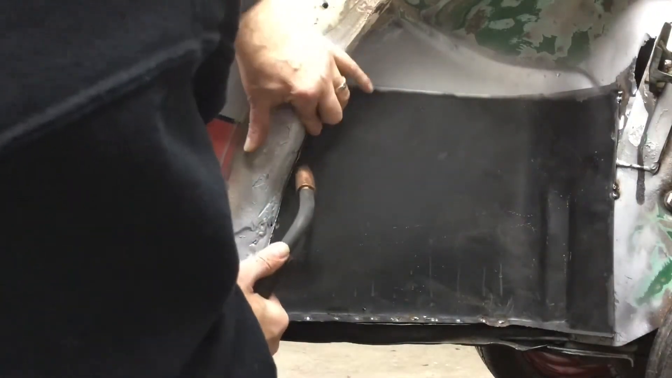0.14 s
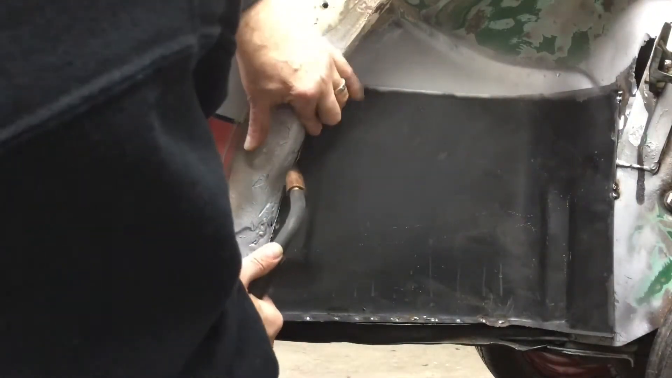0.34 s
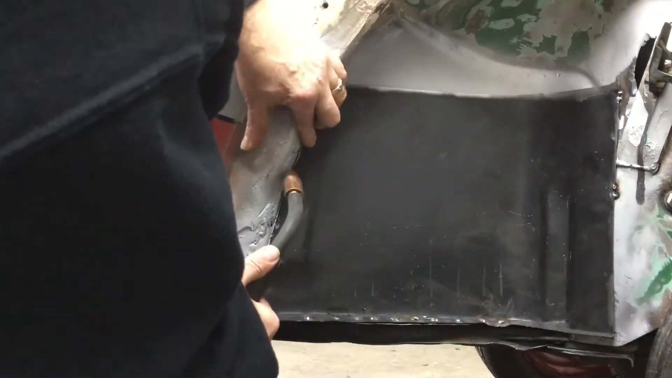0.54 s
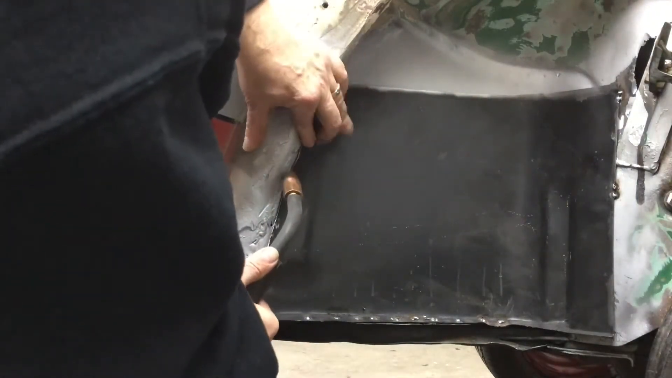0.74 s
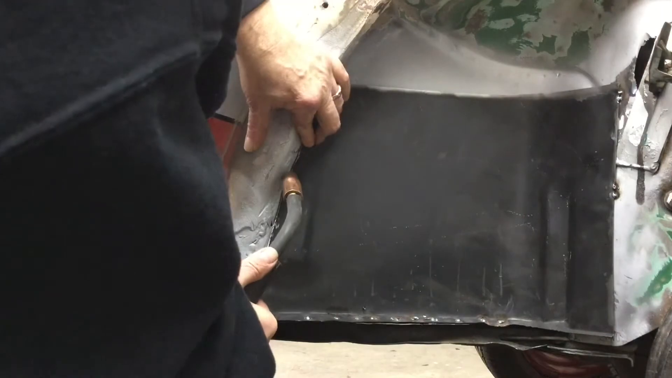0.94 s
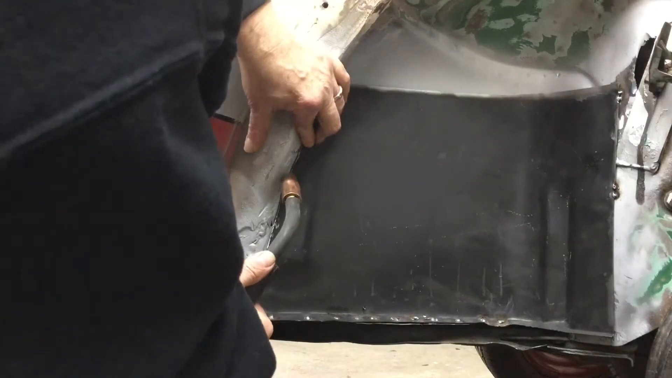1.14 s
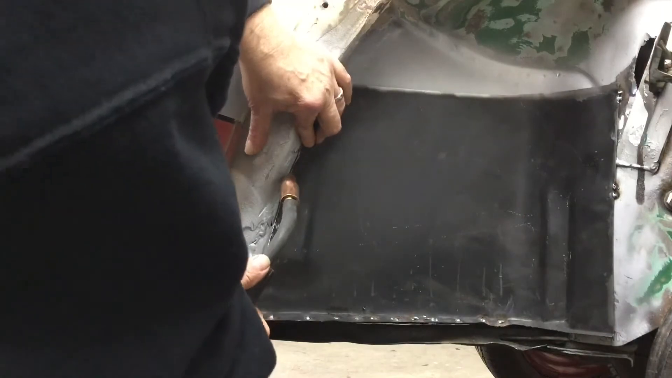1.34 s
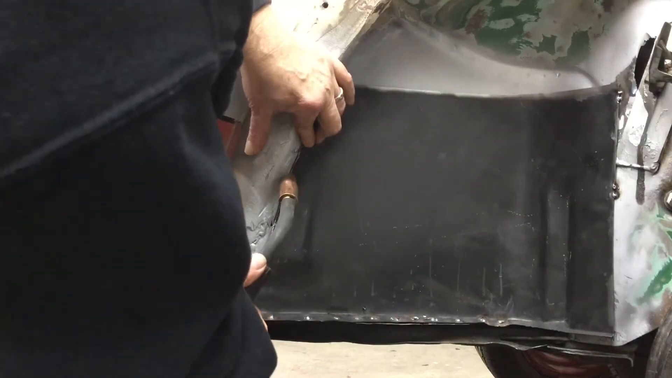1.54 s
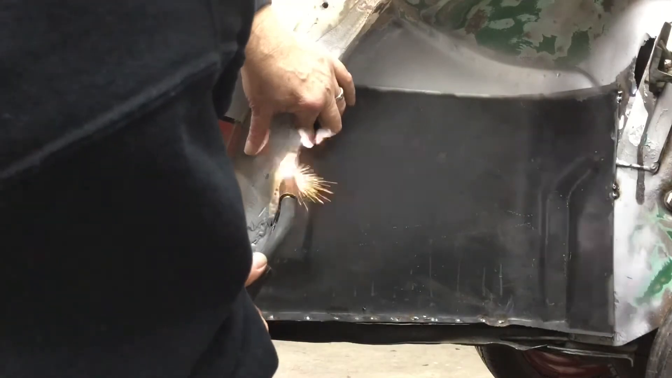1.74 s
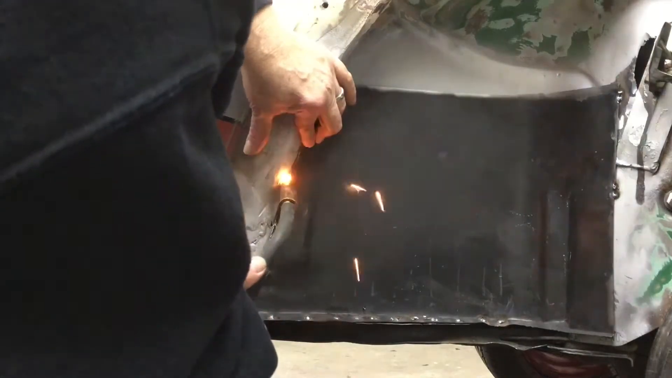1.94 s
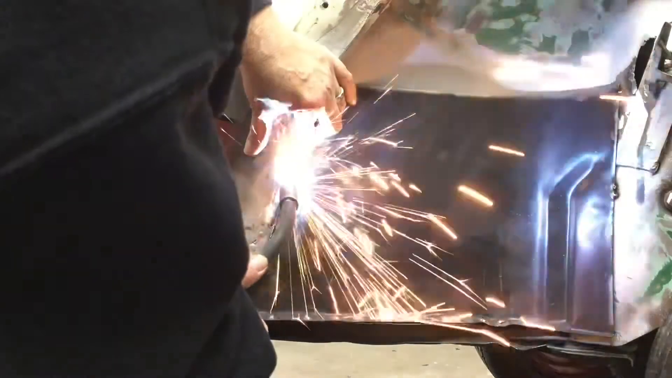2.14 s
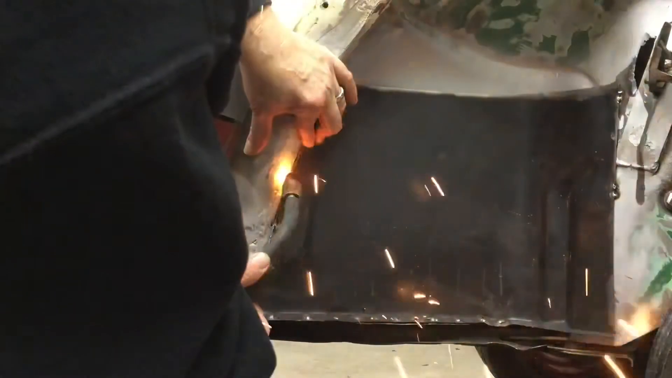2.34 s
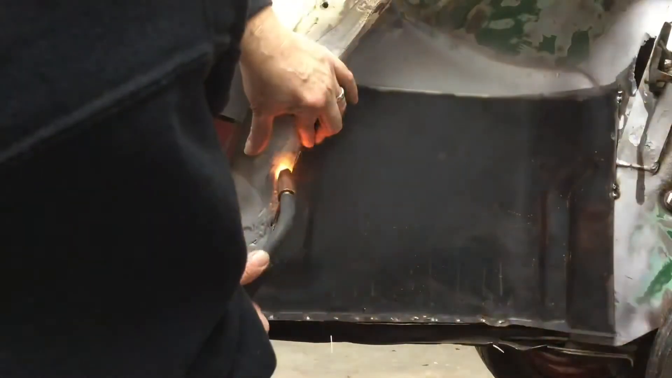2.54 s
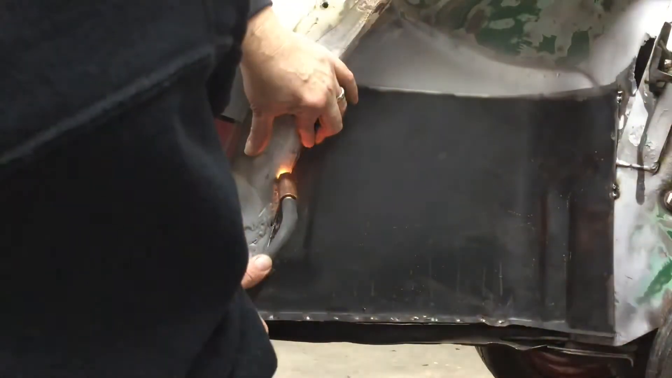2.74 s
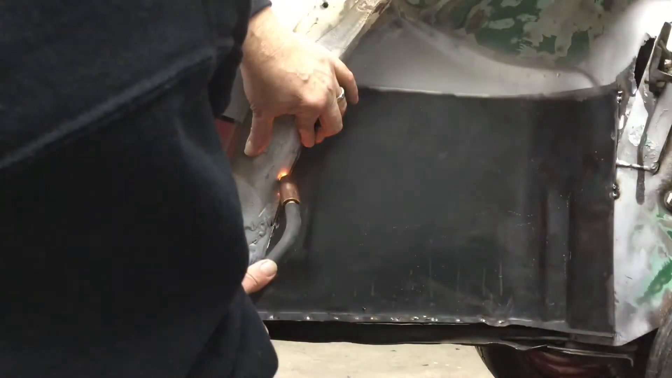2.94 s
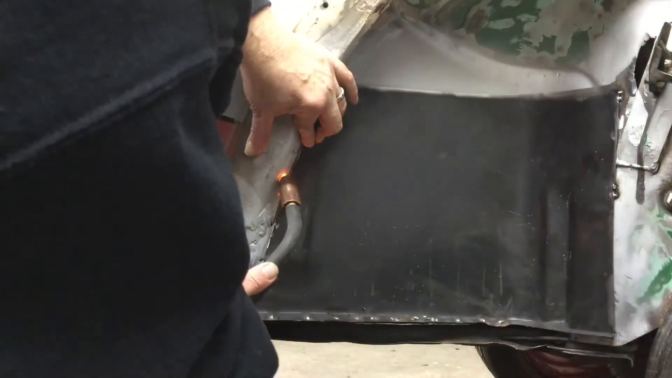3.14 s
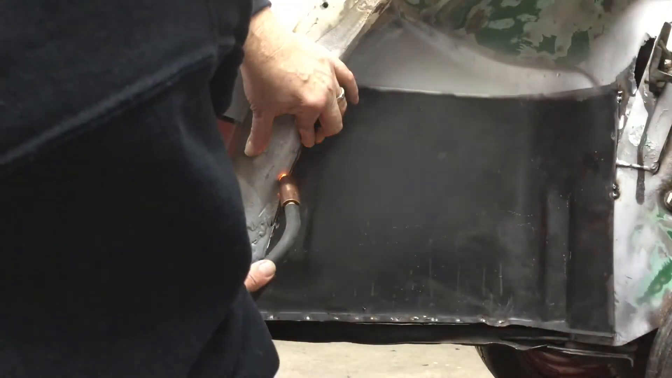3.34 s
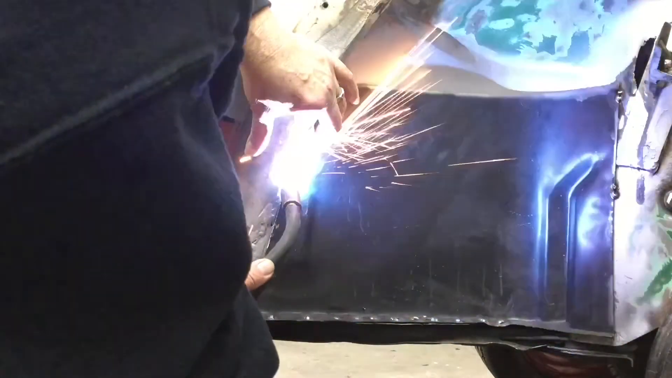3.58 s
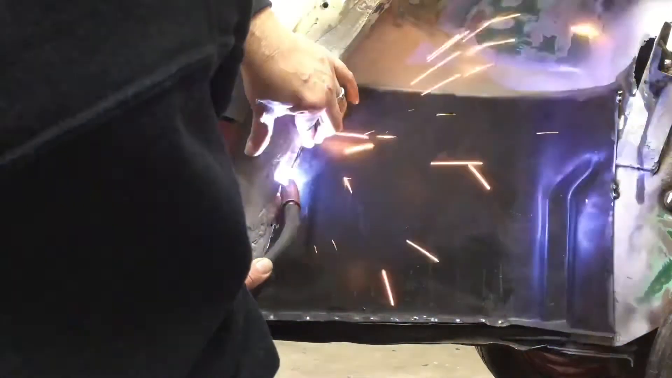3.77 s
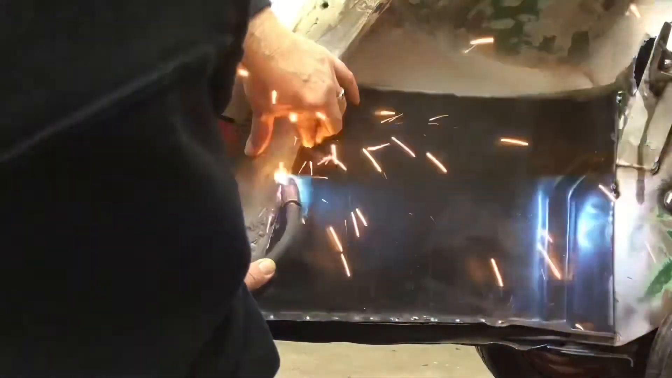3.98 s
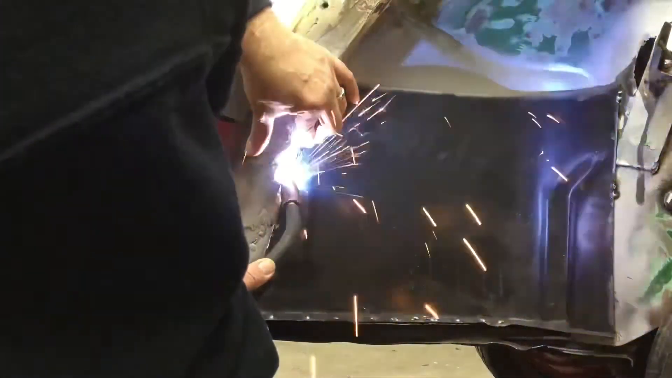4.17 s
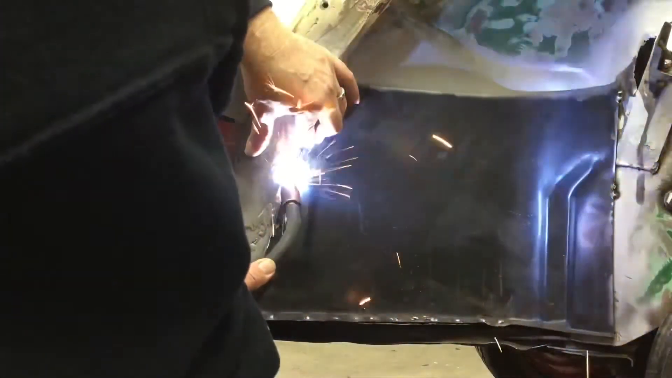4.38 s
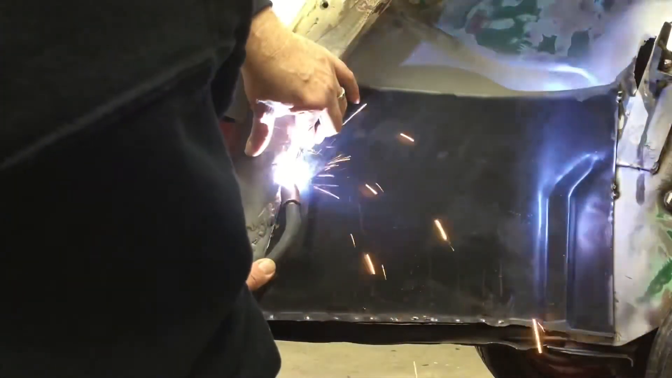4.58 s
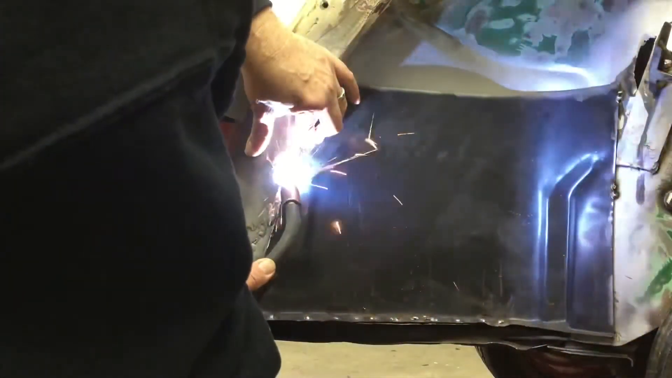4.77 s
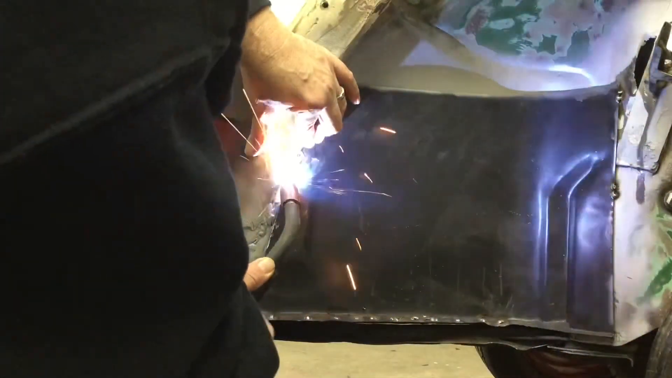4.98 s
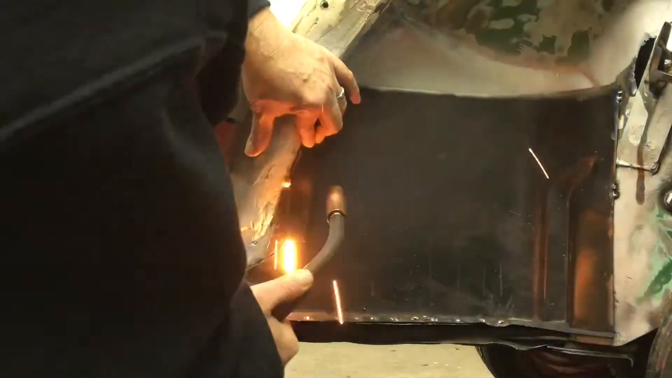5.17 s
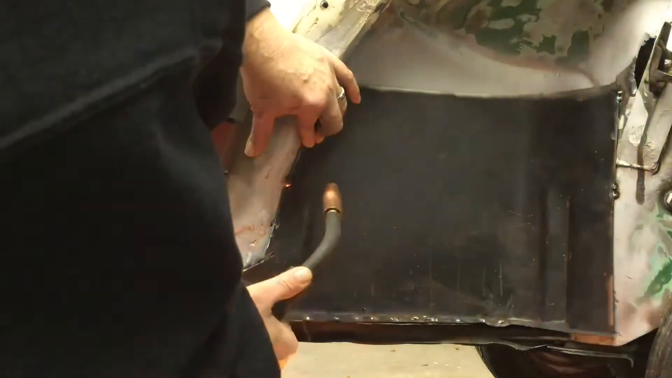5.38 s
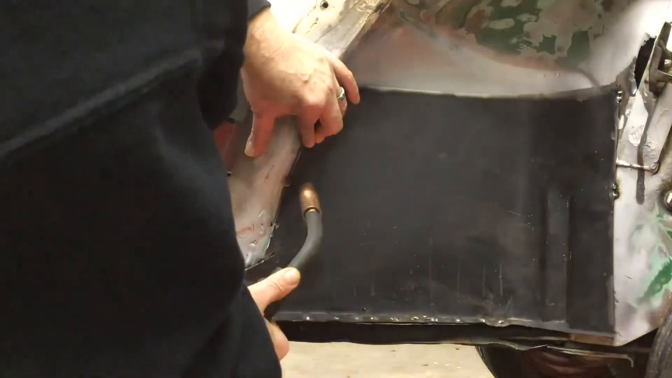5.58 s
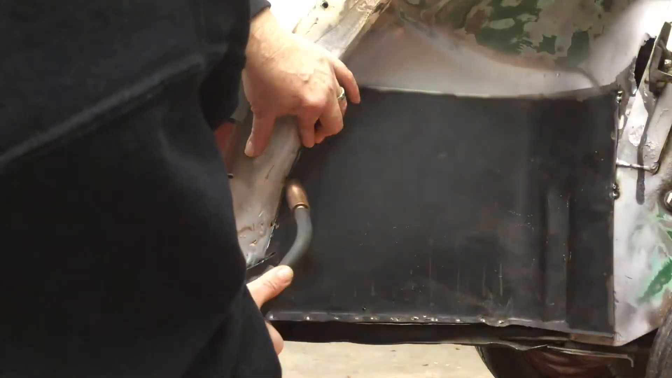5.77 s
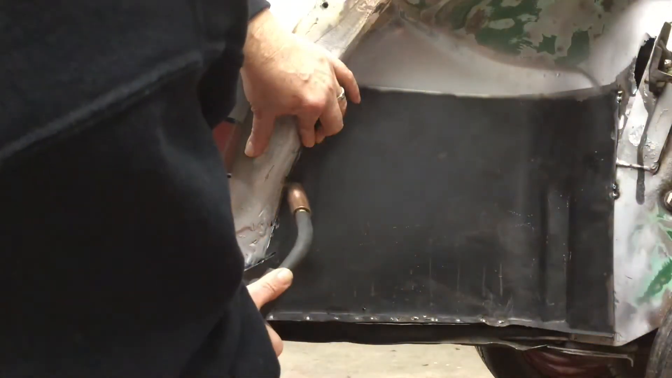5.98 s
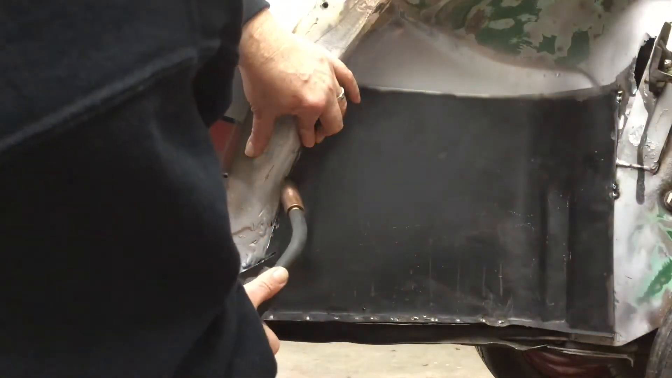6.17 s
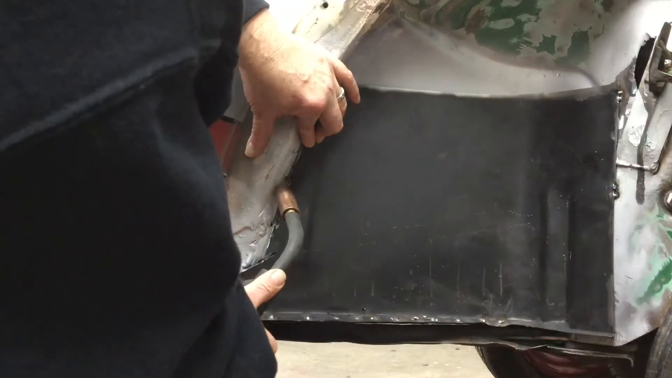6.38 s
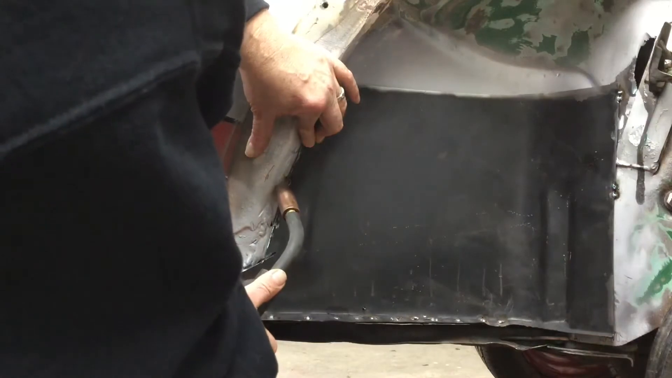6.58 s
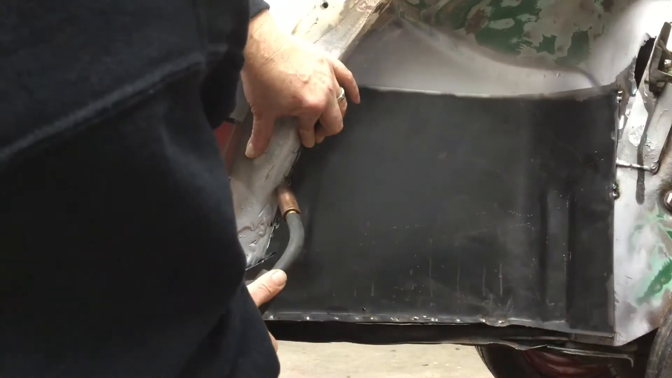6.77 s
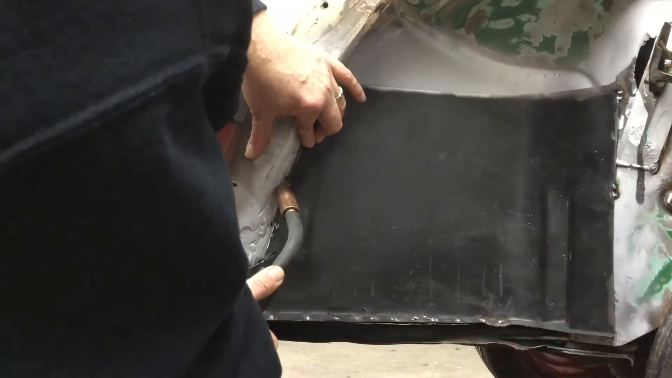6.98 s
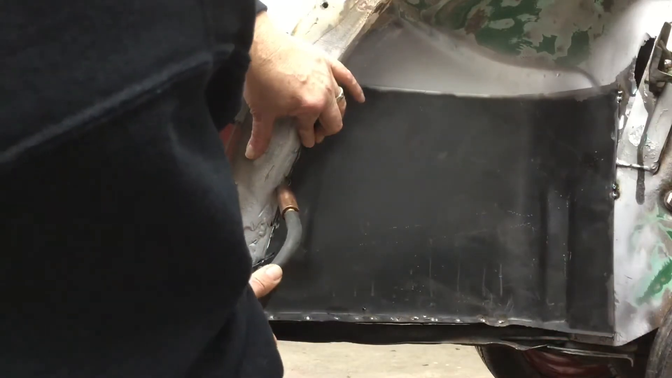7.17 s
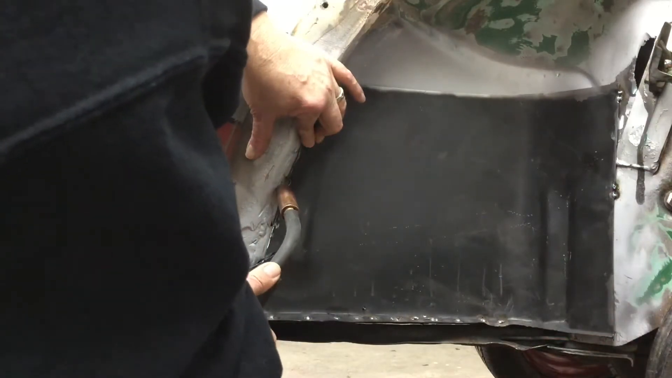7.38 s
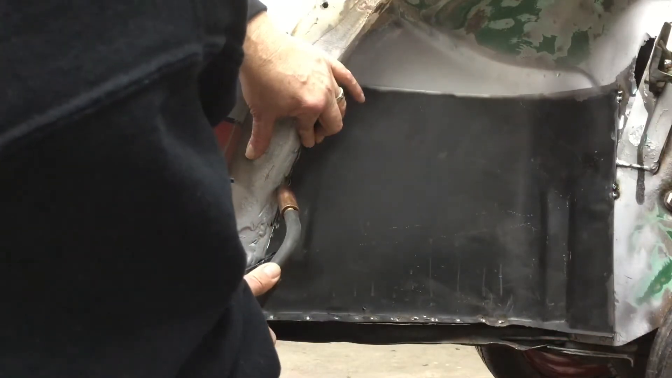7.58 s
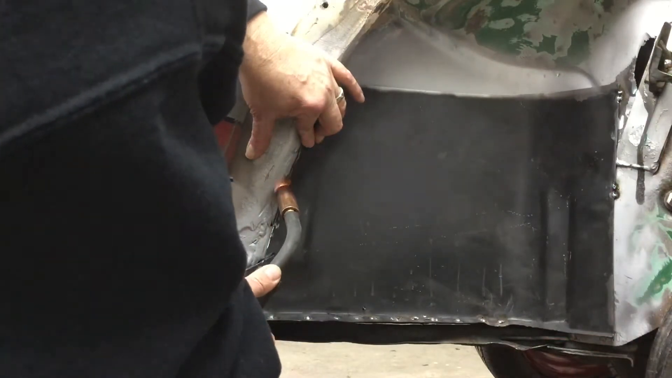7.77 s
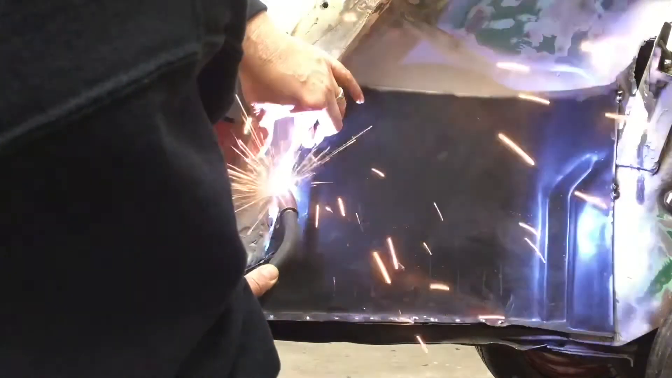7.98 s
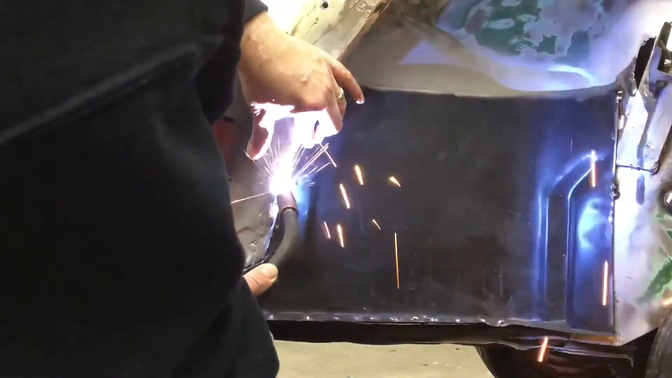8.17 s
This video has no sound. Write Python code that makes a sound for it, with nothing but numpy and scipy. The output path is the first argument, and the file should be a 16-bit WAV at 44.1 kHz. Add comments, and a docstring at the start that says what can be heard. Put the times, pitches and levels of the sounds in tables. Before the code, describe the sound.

Throughout, a small fan hums at a low steady pitch with soft rushing air in a workshop. From 0.1 to 1.1 s a torch and hand make faint scuffs, ticks and dull knocks on thin sheet steel. At 1.65 s gas hisses from the nozzle and the arc spits hard pops at about 1.73 and 1.91, then a short crackle to 2.05. Clunks and rubs come at 2.45-2.75. Gas returns at 3.4 with two heavy pops, a knock at 3.6, then dense, uneven crackling and low sputter from 3.7 to 4.88. A knock at 5.48 starts a thin bright hiss that fades until about 7, with light knocks at 6.3, 6.5 and 6.86. Gas resumes at 7.48, a bright scrape at 7.63, a loud pop at 7.72, then rapid snapping to the end. Close microphone overloads; panel and room echo the snaps.

```python
"""A fan hums throughout a small workshop: blade harmonics, a case drone and the broadband noise of air.
First a torch knocks and scuffs on thin sheet steel, as decaying panel modes and grainy friction noise.
Two welds follow, with more handling in between: gas hisses through a resonant nozzle, the molten pool sputters,
and each short of the wire relights the arc with a snap that panel and room throw back; hard pops overload
the microphone. After the second weld come more knocks and a thin fading hiss, then a third weld to the end."""
import sys
import numpy as np
from scipy import signal
from scipy.fft import rfft, irfft
from scipy.io import wavfile

SR = 44100
rng = np.random.default_rng(int(sys.argv[2]) if len(sys.argv) > 2 else 0)


def store_wav(level_fs):
    """Save 16-bit WAV to argv[1]."""
    pcm = np.round(np.clip(np.atleast_2d(level_fs), -1, 1) * 32767)
    wavfile.write(sys.argv[1], SR, pcm.T.astype(np.int16))


N = 362502
TIME = np.arange(N) / SR
EDGE_HZ = 15900  # upper band limit


def amp(db):
    """Level: converts decibels to an amplitude ratio."""
    return 10 ** (np.asarray(db) / 20)


def unit(x):
    """Normalisation: scales a signal to rms 1."""
    return x / np.sqrt(np.mean(x ** 2) + 1e-20)


def read(points, hz):
    """Interpolation: reads a (frequency, value) table on a log-frequency axis."""
    f, value = np.transpose(points)
    return np.interp(np.log(hz + 1), np.log(f + 1), value)


def bins(size):
    """Discrete spectrum: the frequencies [Hz] for this many samples."""
    return np.fft.rfftfreq(size, 1 / SR)


def add(mix, s, sound):
    """Superposition: adds a sound into the mix at time s [s]."""
    part = mix[max(round(s * SR), 0):][:len(sound)]
    part += sound[:len(part)]


def noise(gain, size):
    """Spectral shaping: random noise of rms 1, weighted by the given gain."""
    return unit(irfft(rfft(rng.standard_normal(size)) * gain, size))


def drift(hz, order=12):
    """Low-pass randomness: slow noise up to about hz, computed every order samples at rms 1."""
    size = N // order + 2
    slow = noise(1 / (1 + (bins(size) / order / hz) ** 4), size)
    return np.interp(np.arange(N) / order, np.arange(size), slow)


def tilt_db(hz, slope):
    """Spectral tilt: a slope in dB per octave about 4 kHz, flat below 1 kHz."""
    return slope * np.log2(np.maximum(hz, 1000) / 4000)


def causal(db, smear=0):
    """Minimum phase: the click of energy 1 with this spectrum, its treble up to smear seconds late."""
    size = 2 * len(db) - 2
    log_gain = np.log(amp(db))
    mirrored = np.r_[log_gain, log_gain[-2:0:-1]]
    phase = -signal.hilbert(mirrored).imag[:len(db)]
    # a quadratic phase delays each frequency in proportion to its height
    phase -= np.pi * smear * bins(size) ** 2 / EDGE_HZ
    click = irfft(np.exp(log_gain + 1j * phase))
    return click / np.linalg.norm(click)


def resonate(x, hz, width):
    """Heterodyning: shifts x down by the moving pitch hz, low-passes it and shifts it back."""
    turn = np.exp(2j * np.pi * np.cumsum(hz) / SR)
    r = np.exp(-np.pi * width / SR)
    smoothed = signal.lfilter([(1 - r) ** 2], [1, -2 * r, r * r], x / turn)
    return (turn * smoothed).real


FAN_HZ = 256.5  # mean blade rate
# Harmonics of the blade rate: (multiple, level [dB])
FAN_HARMONICS = [(1, -69.5), (2, -54.5), (3, -65), (4, -86), (5, -69.5), (6, -71.5), (7, -62.5), (8, -75)]
# Relative spectrum of the moving air: (frequency [Hz], level [dB])
AIR_SPECTRUM = [(25, -31.5), (60, -19), (130, -13.5), (240, -8.5), (390, -20.5), (520, -12), (660, -17),
                (1150, -15.5), (1550, -22.5), (1850, -21), (2300, -21.5), (3700, -24), (5000, -36.5),
                (7000, -44.5), (16000, -47)]
AIR_DB = -53.5


def fan(waver=.0012, flutter_db=0.5, drone_hz=238, drone_width_hz=14, drone_db=-63.0):
    """Blade-passing tones: wavering harmonics, with a resonant drone of the case and rushing air."""
    hz = bins(N)
    turns = np.cumsum(FAN_HZ * (1 + waver * drift(4))) / SR
    tones = np.zeros(N)
    for multiple, db in FAN_HARMONICS:
        level = amp(db + flutter_db * drift(12)) * np.sqrt(2)
        tones += level * np.sin(2 * np.pi * (multiple * turns + rng.random()))
    drone = amp(drone_db) * noise(1 / (1 + ((hz - drone_hz) / drone_width_hz) ** 2), N)
    air = amp(AIR_DB) * noise(amp(read(AIR_SPECTRUM, hz)), N)
    return tones + drone + air


# Relative spectrum of the thin hiss: (frequency [Hz], level [dB])
HISS_SPECTRUM = [(1500, -1.5), (4500, -1), (7200, -10), (8500, -2.5), (10500, -5.5), (13300, 2.5),
                 (16000, -10.5)]
HISS_START_S, HISS_STOP_S = 5.47, 7.05
HISS_DB, HISS_FADE_DB_PER_S = -56.5, 11  # starting level, steady fall


def hiss(attack=0.018, release=.1, waver_db=-0.4):
    """Exponential decay: a thin noise sets in beside a knock, wavers as it fades, then dies away."""
    age = np.maximum(TIME - HISS_START_S, 0)
    level = amp(HISS_DB - HISS_FADE_DB_PER_S * age + waver_db * drift(7.9))
    level *= np.minimum(age / attack, 1)
    level *= np.exp(-np.maximum(TIME - HISS_STOP_S, 0) / release)
    return level * noise(amp(read(HISS_SPECTRUM, bins(N))), N)


# Late reverberation of the room: (frequency [Hz], time to fall by 60 dB [s])
ROOM_T60 = [(100, 0.62), (500, 0.62), (1500, 0.48), (4000, 0.6), (9000, 0.38), (15000, 0.25)]


def workshop(x, gap=.009, early_db=7, early_decay=0.024):
    """Diffuse reverberation: a noise tail after a short gap, strongest early, each band dying at its own speed."""
    hz, t, grains = signal.stft(rng.standard_normal(SR * 3 // 4), SR, nperseg=256)
    early = early_db * np.exp(-t / early_decay)
    late = -60 * t / read(ROOM_T60, hz)[:, None]
    tail = signal.istft(grains * amp(early + late), SR, nperseg=256)[1]
    tail = np.r_[np.zeros(round(gap * SR)), tail / np.linalg.norm(tail)]
    return signal.oaconvolve(x, tail)[:N]


# Wire tip and hand rubbing the steel: (time [s], length [s], level [dB], treble tilt [dB per octave])
RUBS = [(0.253, 0.04, -48.5, -4), (0.273, 0.042, -54, 6), (0.373, 0.056, -55, -4.5),
        (0.49, 0.064, -58.5, 7), (0.809, .04, -55.5, 7), (1.097, 0.018, -54, 12.5),
        (2.638, 0.0043, -46, -1), (2.73, 0.032, -39, -6.5), (5.148, 0.0055, -57, -2),
        (5.476, 0.018, -41.5, -4.5), (6.86, 0.0079, -42.5, -7), (7.484, 0.006, -44, -2),
        (7.632, 0.017, -24.5, 5.5)]
# Relative spectrum of a rub: (frequency [Hz], level [dB])
RUB_SPECTRUM = [(500, 7), (2500, -1), (5000, 6.5), (7000, -0.5), (9500, 0), (13500, 3), (16000, -3)]
# The grip shifting, with faint ticks at random: (start [s], stop [s])
GRIP_SHIFTS = [(.1, .22), (.97, 1.06), (2.3, 2.45)]
TICK_S, TICK_DB, TICK_TILT = .012, -63.5, 2.2  # length, level, dB per octave


def scuffs(grain_db=4, count=2, size=8192):
    """Friction noise: short strokes with a rapid random grain, some dull and some bright."""
    out, hz = np.zeros(N), bins(size)
    ticks = []
    for start, stop in GRIP_SHIFTS:
        for s in start + (stop - start) * rng.random(count):
            ticks.append((s, TICK_S, TICK_DB, TICK_TILT))
    for s, length, db, slope in RUBS + ticks:
        stroke = signal.windows.tukey(round(length * SR), .7)
        rub = noise(amp(read(RUB_SPECTRUM, hz) + tilt_db(hz, slope)), size)
        add(out, s, amp(db) * stroke * rub[:len(stroke)])
    return out * unit(amp(grain_db * drift(750)))


# Wire, torch and hand striking the panel:
# (time [s], thud [dB], clunk [dB], tap [dB], share of energy that rings on [0-1])
BLOWS = [(0.364, -42.5, -47, -49, 0.95), (1.106, -67, -51, -64, .9), (1.731, -32, -21, -36, 0.8),
         (2.468, -38, -29, -31.5, 0.87), (2.637, -34.5, -27.5, -26, 1), (2.746, -38.5, -45, -46, 0.7),
         (3.575, -45, -33, -28.5, 1), (5.479, -36.5, -58, -51, 0), (6.3, -38, -36, -42, 0.84),
         (6.538, -51, -41.5, -56, 0.84), (6.860, -51.5, -42, -54, 0.5)]
# Panel resonances, in three equal groups from low to high: (frequency [Hz], width [Hz], level [dB])
PANEL_MODES = [(160, 45, -9), (260, 54, 5), (383, 86, -6.5), (697, 200, 9.5), (926, 26, 12), (1140, 77, -2),
               (1270, 260, -0.5), (1700, 250, 4), (2520, 733, -8.5)]


def knocks(thud_t60=0.25, clunk_t60=0.13, tap_t60=0.059, size=16384):
    """Modal decay: a blow gives one push and a ring of dense panel modes; the high ones die first."""
    out, t, hz = np.zeros(N), np.arange(size) / SR, bins(size)
    gains = []
    for group in np.split(np.array(PANEL_MODES), 3):
        gains.append(sum(amp(db) / (1 + ((hz - f) / width) ** 2) ** 1.5 for f, width, db in group))
    t60s = (thud_t60, clunk_t60, tap_t60)
    rises = (.003, .0012, .0003)  # s
    for s, *levels, share in BLOWS:
        share = np.clip(share, 0, 1)
        for db, gain, t60, rise in zip(levels, gains, t60s, rises):
            envelope = amp(db - 60 * t / t60) * (1 - np.exp(-t / rise))
            push = np.linalg.norm(envelope) * causal(20 * np.log10(gain))
            ring = envelope * noise(gain, size)
            add(out, s, np.sqrt(1 - share) * push + np.sqrt(share) * ring)
    return out


# Flow while the trigger is held: (start [s], stop [s], level [dB], settled nozzle pitch [Hz])
GAS_FLOWS = [(1.648, 2.062, -41, 1710), (3.387, 4.891, -37.5, 1720), (7.476, 8.3, -39, 1606)]
# Relative spectrum of the rush: (frequency [Hz], level [dB])
GAS_SPECTRUM = [(200, -13.5), (800, -1), (1250, 1), (2400, -6.5), (3000, -9.5), (4200, 2), (5800, 2.5),
                (7200, -5.5), (8600, 1), (10600, -9), (11800, 2.5), (12700, 6), (13600, 1), (16000, -1.5)]


def gas(opening=0.0061, run_on=0.071, flutter_db=0.54, whistle_db=-7, whistle_width_hz=170,
        air_hz=260, flush=0.013):
    """Turbulence and cavity resonance: the nozzle's pitch falls as heavy shielding gas drives out the air."""
    flow, pitch = np.zeros((2, N))
    for on, off, db, hz in GAS_FLOWS:
        opened = np.clip((TIME - on) / opening, 0, 1)
        flow += amp(db) * opened * np.exp(-np.maximum(TIME - off, 0) / run_on)
        pitch = np.where(TIME > on, hz + air_hz * np.exp(-abs(TIME - on) / flush), pitch)
    whistle = amp(whistle_db) * unit(resonate(rng.standard_normal(N), pitch, whistle_width_hz))
    rush = noise(amp(read(GAS_SPECTRUM, bins(N))), N)
    return flow * amp(flutter_db * drift(40)) * (whistle + rush)


# Swells of sputter: (time of the height [s], level [dB], rise [s], fall [s])
POOL_SWELLS = [(3.78, -47.5, 0.067, .8), (4.63, -35.5, .1, 0.1), (7.685, -43.5, 0.024, 0.11)]
# Relative spectrum of the sputter: (frequency [Hz], level [dB])
POOL_SPECTRUM = [(60, -36.5), (130, -14), (190, -2.5), (280, 3.5), (420, -13.5), (800, -3), (1300, -13.5),
                 (2500, -30.5)]


def pool(lump_db=4):
    """Random amplitude modulation: the molten pool's low, lumpy sputter comes in swells."""
    level = np.zeros(N)
    for s, db, rise, fall in POOL_SWELLS:
        level += amp(db) * np.exp(-((TIME - s) / np.where(TIME < s, rise, fall)) ** 2)
    return level * unit(amp(lump_db * drift(45))) * noise(amp(read(POOL_SPECTRUM, bins(N))), N)


# Pops that blow the molten drop away with a push of air:
# (time [s], level [dB], decay [s], initial pitch above the final one [Hz])
DROP_BLASTS = [(1.7295, -4.5, 0.018, 1110), (1.9101, -2.5, 0.012, 670), (3.4705, -7, 0.024, 330),
               (4.764, -22.5, 0.0037, 414), (7.7173, -25.5, 0.013, 497), (7.923, -35, 0.011, 304)]
PUFF_DB, PUFF_DECAY_S, PUFF_HZ = -41, 0.0067, 219  # small push of every loud pop, dB re its body


def blasts(end_hz=46, quick_turns=1.1, settle=0.036, burst_db=-8.0, burst_decay=0.0045, burst_hz=3000):
    """Damped oscillation: a bursting drop cracks roughly and its air swings the microphone ever slower."""
    out, t = np.zeros(N), np.arange(SR // 6) / SR
    puffs = [(s, body_db + PUFF_DB, PUFF_DECAY_S, PUFF_HZ) for s, _, body_db in LOUD_POPS]
    dull = 1 / (1 + (bins(len(t)) / burst_hz) ** 4)
    for s, db, decay, start_hz in DROP_BLASTS + puffs:
        turns = np.cumsum(end_hz + start_hz / (1 + t * start_hz / quick_turns) ** 1.5) / SR
        push = np.sin(2 * np.pi * turns) * np.exp(-t / decay - (t / settle) ** 2)
        burst = amp(burst_db) * noise(dull, len(t)) * np.exp(-t / burst_decay)
        add(out, s, amp(db) * (push + burst))
    return out


# Reflections off the panel and things nearby: (delay [s], level [dB], treble tilt [dB per octave])
REFLECTIONS = [(.00122, 2, 1.2), (.0024, -12, -1), (.00285, -8, 0.6), (.0051, -16, 0), (.0101, -15, 1.5),
               (.0114, -21, 0), (.0171, -21, 0), (.0198, -19, -1)]


def nearby(x, size=2048):
    """Image sources: the panel mirrors the torch a moment later; bodywork and floor follow."""
    hz = bins(size)
    paths = 1  # the direct sound
    for delay, db, slope in REFLECTIONS:
        paths = paths + amp(db + tilt_db(hz, slope)) * np.exp(-2j * np.pi * hz * delay)
    return signal.oaconvolve(x, irfft(paths)[:size * 3 // 4])[:N]


def scatter(scatter_db=-7.0, scatter_decay=0.0039, size=1024):
    """Diffuse scattering: each snap meets a new random spray, as torch and pool never hold still."""
    t = np.arange(size) / SR
    spray = rng.standard_normal(size) * np.exp(-t / scatter_decay)
    spray *= t > REFLECTIONS[0][0]  # starts after the first reflection
    return (t == 0) + amp(scatter_db) * spray / np.linalg.norm(spray)


# Stretches of steady arc that crackle between the loud pops: (start [s], stop [s], relative crack level [dB])
STEADY_RUNS = [(1.993, 2.029, -7), (3.77, 3.803, -15), (3.901, 4, -1), (4.053, 4.182, -7.5),
               (4.219, 4.81, 0.5), (7.905, 8.217, -1)]
SHORT_S = .02  # nominal time between dips of the wire into the pool


def shorts(jitter=.1, spread_db=2.0, body_db=-10, body_spread_db=3.0):
    """Relaxation rhythm: shorts recur almost regularly, restarted by each pop. Rows like LOUD_POPS."""
    beats = []
    for start, stop, db in STEADY_RUNS:
        restarts = [s for s, *_ in LOUD_POPS if start + SHORT_S / 2 < s < stop - SHORT_S / 2]
        marks = [start] + restarts + [stop]
        for a, b in zip(marks, marks[1:]):
            beats += [(s, db) for s in np.linspace(a, b, round((b - a) / SHORT_S) + 1)[1:-1]]
    rows = []
    for (s, db), (late, hard, full) in zip(beats, rng.standard_normal((len(beats), 3))):
        crack_db = db + spread_db * hard
        rows.append((s + jitter * SHORT_S * late, crack_db, crack_db + body_db + body_spread_db * full))
    return rows


# Resonances that the gas nozzle beams forward: (frequency [Hz], width [Hz], lift [dB])
NOZZLE_RESONANCES = [(1160, 260, 11), (1637, 240, 1), (4430, 220, 9), (5240, 120, 16), (5920, 67, 7),
                     (8560, 130, -10.5), (9330, 130, -5.5), (11984, 380, 11.5), (13700, 250, -2),
                     (12700, 380, 3.5)]


def nozzle_db(hz):
    """Resonant directivity: the lifts and dips that the nozzle gives to a snap, in dB."""
    return sum(db / (1 + (2 * (hz - f) / width) ** 2) for f, width, db in NOZZLE_RESONANCES)


# Loud pops, where the wire stubs and the arc relights hard:
# (time [s], relative crack level [dB], relative low-mid body level [dB])
LOUD_POPS = [(1.6641, 2, 1), (1.7289, 14, 4), (1.9082, 16.5, 6), (1.9912, -1, -5), (2.0323, 2.5, -1.5),
             (2.045, 1.5, -0.5), (3.4097, 14, 5), (3.4689, 14, 5.5), (3.6254, 9.5, 2), (3.7101, 9, 0),
             (3.755, 7.5, -8.5), (3.761, -0.5, -6), (3.7669, 2, 2), (3.8255, 6.5, -5), (3.8393, 2, 0),
             (3.9014, 9.5, -0.5), (3.9618, 2.5, -6), (4.0049, 3, -7.5), (4.0524, 9, -1), (4.1107, 3.5, -4),
             (4.1262, 8, 0.5), (4.151, 5, -6), (4.2192, 9, 1), (4.3243, 0, -14), (4.3389, 7, 1.5),
             (4.3689, 4, -9), (4.4498, 3, -6), (4.5352, 7, -7), (4.7137, 6.5, 1.5), (4.744, 6.5, 0),
             (4.7637, 8.5, -0.5), (4.8092, 3.5, -1.5), (4.8512, 6, -2), (4.8803, 3.5, -2), (7.716, 16, 1),
             (7.8211, 0, -7), (7.832, 8, -1), (7.871, 1, -12), (7.8876, 10, 1), (7.905, 11, -5.5),
             (7.9224, 7.5, -3.5), (8.0287, 8.5, -0.5), (8.1295, 4.5, -4.5), (8.2172, 4, -14)]
# Relative spectrum of the crack: (frequency [Hz], level [dB])
CRACK_SPECTRUM = [(1500, -40.5), (2300, -14.5), (2900, -1), (3900, 2.5), (5000, 3), (6100, 2), (7000, -10),
                  (8500, 6.5), (10600, -3), (12500, 7), (14200, 4), (16000, -15.5)]
# Relative spectrum of the body: (frequency [Hz], level [dB])
BODY_SPECTRUM = [(40, -19), (90, -23), (230, -3), (450, -6.5), (780, -3), (1000, -7), (1250, 3), (1500, -1),
                 (1800, 2), (1980, -1.5), (2220, -27.5), (4000, -30)]


def arc(spit=0.13, spit_decay=0.00034, spit_spread_db=5, sizzle_db=-15, sizzle_rate=90, size=4096):
    """Impulse radiation: each snap is a click and a varying spit, with tiny spatter ticks after it.
    Gives the sound of the nozzle's beam and the sound sent all round."""
    crack, body, burning = np.zeros((3, N))
    t = np.arange(128) / SR
    for s, crack_db, body_db in LOUD_POPS + shorts():
        spit_level = spit * amp(spit_spread_db * rng.uniform(-1.5, 1))
        burst = spit_level * rng.standard_normal(len(t)) * np.exp(-t / spit_decay)
        burst[0] = 1  # the click
        burst = np.convolve(burst / np.linalg.norm(burst), scatter())
        add(crack, s, amp(crack_db) * burst)
        add(body, s, amp(body_db) * burst)
        add(burning, s, np.ones(round(0.0075 * SR)))  # spatter may fall for 7.5 ms
    struck = rng.random(N) < burning * sizzle_rate / SR
    ticks = struck * rng.standard_normal(N) * amp(sizzle_db)
    hz = bins(size)
    radiated = []
    for lift in (nozzle_db(hz), 0):
        crack_click = causal(read(CRACK_SPECTRUM, hz) + lift, smear=0.0001)
        body_click = causal(read(BODY_SPECTRUM, hz) + lift)
        sound = signal.oaconvolve(crack + ticks, crack_click)
        sound = sound + signal.oaconvolve(body + ticks / 2, body_click)
        radiated.append(sound[:N])
    return radiated


def scene():
    """Superposition: direct, reflected and reverberant sound of torch and handling, over hiss and fan."""
    beam, around = arc()
    flow = gas()
    handling = knocks() + scuffs()
    wet = workshop(amp(-2.5) * around + amp(-16.0) * flow + amp(-6.0) * handling)
    torch = amp(2.0) * nearby(beam) + blasts() + pool() + flow
    return (torch + handling + wet + hiss() + fan())[None]


def record(dry):
    """Saturation: the microphone overloads on the hardest snaps; a low-pass then limits the band."""
    clipped = dry / (1 + dry ** 8) ** (1 / 8)
    low_pass = signal.firwin(401, EDGE_HZ, window=("kaiser", 8), fs=SR)
    return signal.oaconvolve(clipped, low_pass[None], "same")


dry = scene()
out = record(dry)
store_wav(out)
```